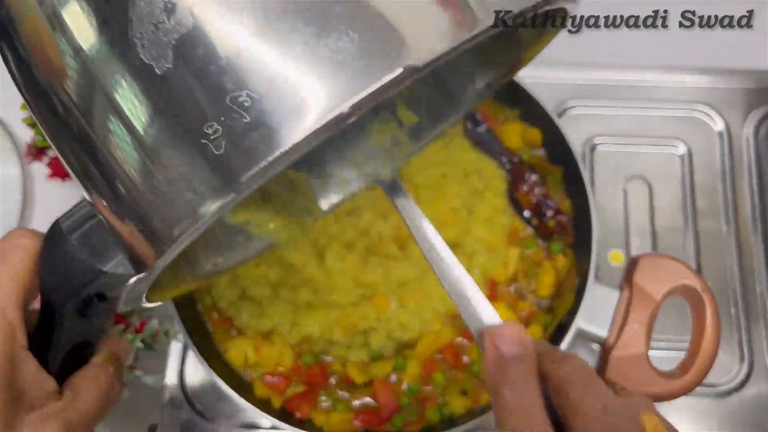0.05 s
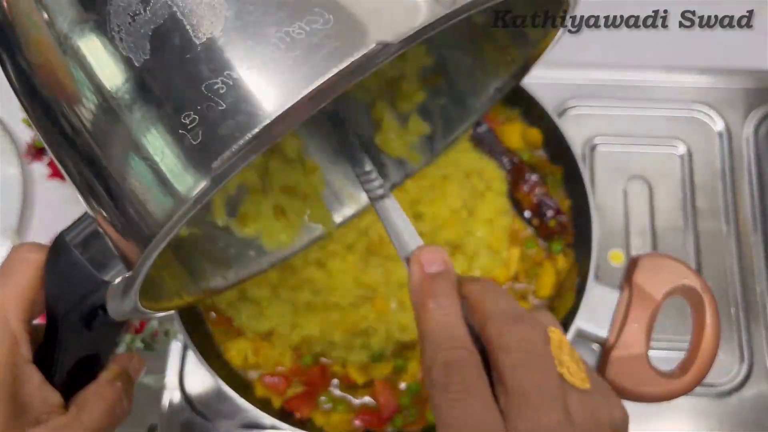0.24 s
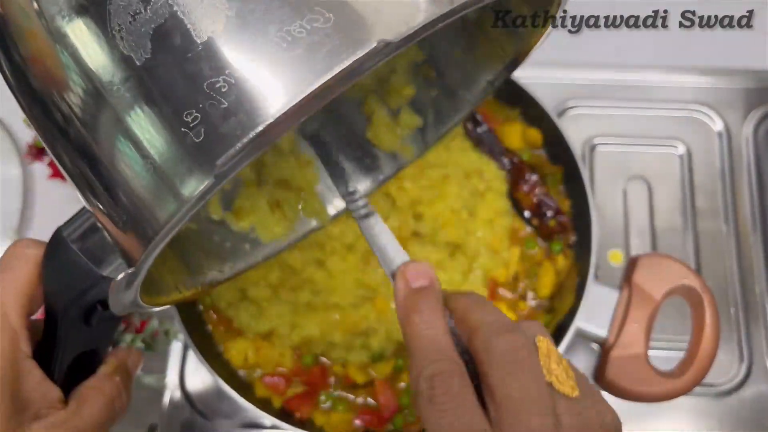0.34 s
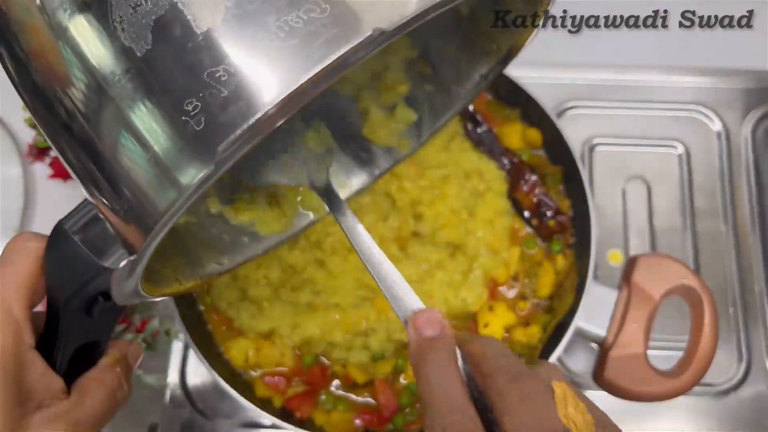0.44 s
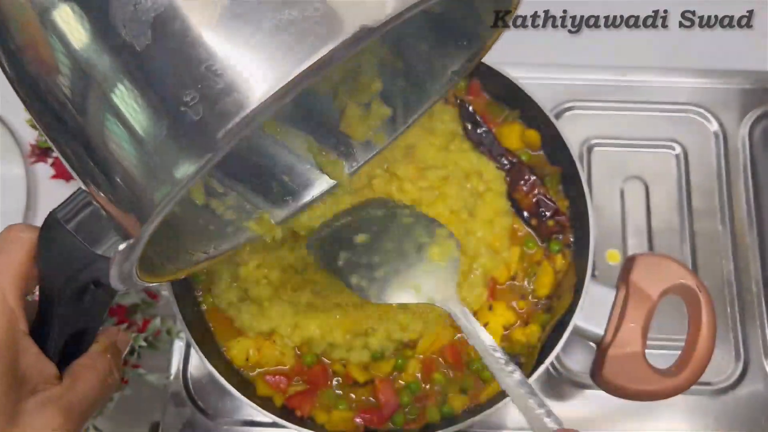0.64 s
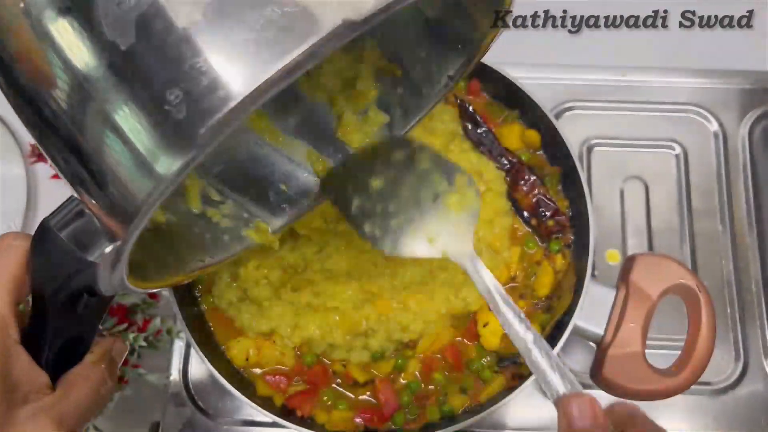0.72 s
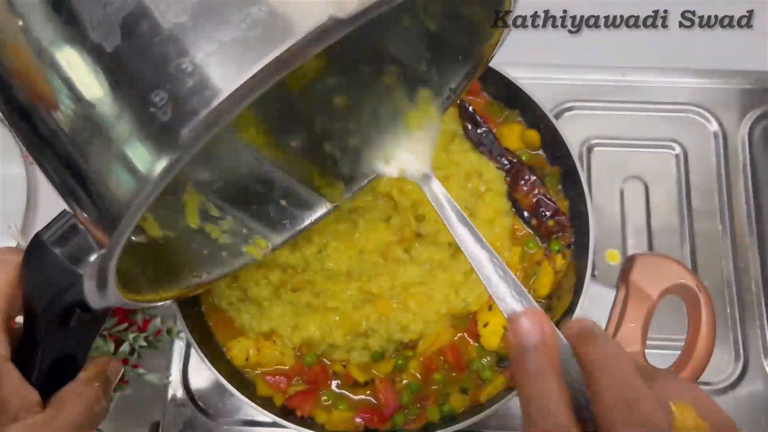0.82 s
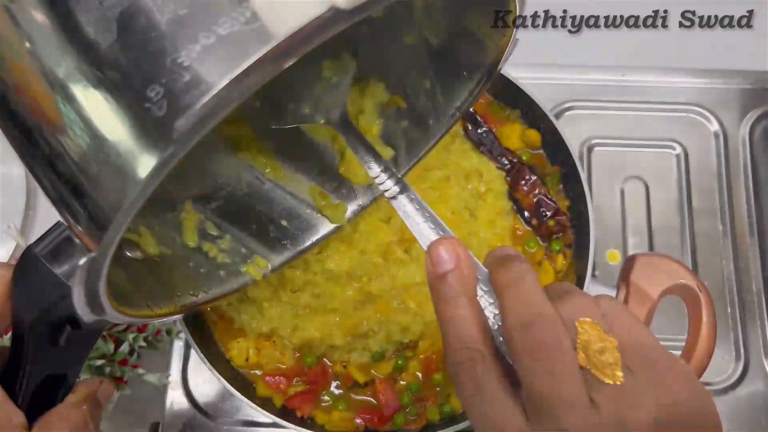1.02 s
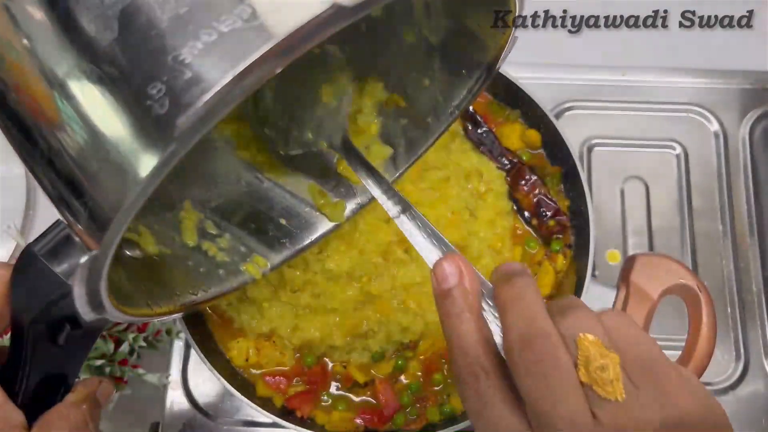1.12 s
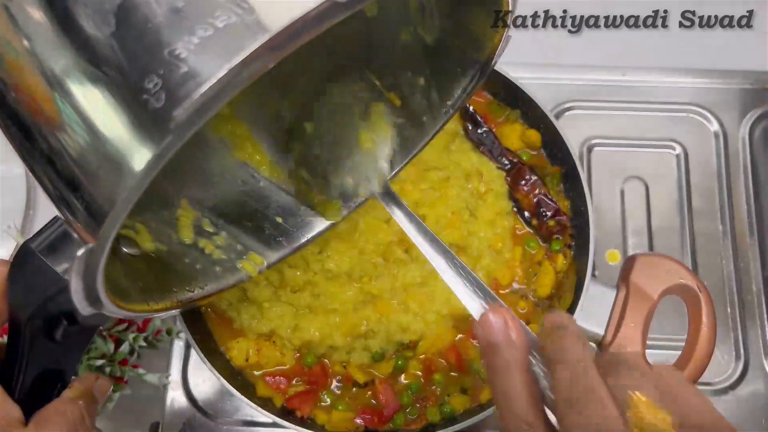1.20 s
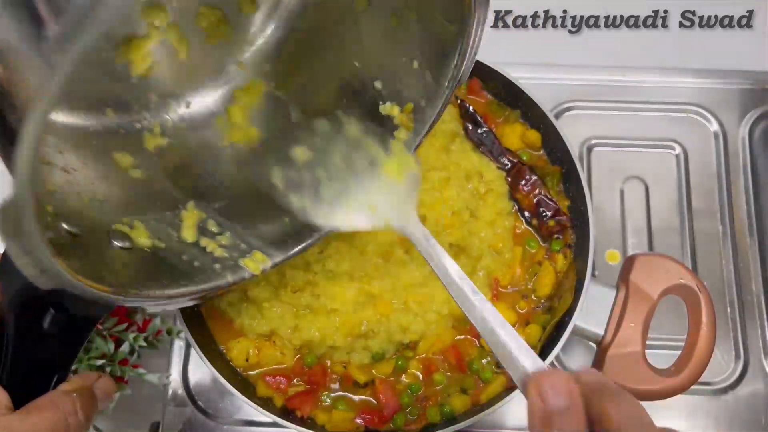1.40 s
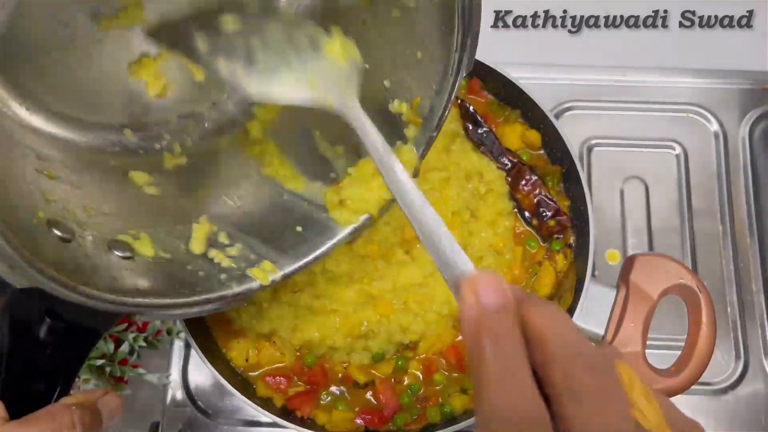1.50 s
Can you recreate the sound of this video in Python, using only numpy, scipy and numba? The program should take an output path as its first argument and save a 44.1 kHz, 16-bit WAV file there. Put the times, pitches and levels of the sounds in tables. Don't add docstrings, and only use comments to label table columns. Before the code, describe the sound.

Close and fairly dry, a metal spoon raps a steel pot in quick clusters, drags with a bright gritty hiss, pauses, then knocks harder and scrapes shorter, above wet food ticks and low kitchen fan noise.

```python
import sys
import numpy as np
from scipy import signal
from scipy.fft import rfft, irfft
from scipy.io import wavfile
from scipy.ndimage import uniform_filter1d
from numba import njit

SR = 44100
rng = np.random.default_rng(int(sys.argv[2]) if len(sys.argv) > 2 else 0)


def persist_wave(psi):
    counts = np.round(np.clip(psi, -1, 1) * 32767).astype(np.int16)
    wavfile.write(sys.argv[1], SR, np.atleast_2d(counts).T)


def gain_from_db(level_db):
    decades = np.asarray(level_db, float) / 20
    return 10 ** decades


N = 68355
T = np.arange(N) / SR
FREQ = np.maximum(np.arange(N // 2 + 1) * SR / N, 1)

# f/Hz, level/dB
SHEET = [(300, -19), (800, -9.5), (3000, 4), (4300, -3.5), (5400, -1), (6600, 3.5), (8500, 5), (16000, -5)]
# f/Hz, level/dB, T60/s
LIFT_B = [(1565, -46, .3), (2057, -47, .5), (3101, -46, .3), (3806, -42, .2), (4956, -52, .4),
          (5435, -40, .13), (5795, -38, .2), (6400, -44, .22), (10130, -46, .2)]


def unit(x):
    return x / np.sqrt(np.mean(x ** 2))


def read(table, hz):
    table_hz, table_db = np.array(table).T
    return np.interp(np.log(hz), np.log(table_hz), table_db)


def add(out, s, x):
    i = int(s * SR)
    out[i:i + len(x)] += x[:N - i]


def band(x, hz, width):
    return signal.lfilter(*signal.iirpeak(min(hz, SR * .45), hz / width, fs=SR), x)


def walk(rate, count=N):
    k = int(SR / rate)
    steps = np.repeat(rng.standard_normal(count // k + 1), k)
    return 1.74 * uniform_filter1d(uniform_filter1d(steps, k), k)[:count]


def kitchen():
    # f/Hz, level/dB per Hz
    room_noise = [(30, 2), (60, -5), (100, -2), (200, -23.5), (300, -15), (500, -7.5), (1400, -16.5),
                  (5000, -26.5), (16000, -28.5)]
    # f/Hz, width/Hz, level/dB
    fan = [(78.5, 9.4, -56), (121.2, 4.1, -59.5), (155.9, 4, -66), (294.4, 16, -64), (527, 14, -71),
           (891, 22, -70.5)]
    out = 0
    for hz in 35 * 2 ** np.arange(0, 9, .5):
        window = np.maximum(1 - np.abs(np.log2(FREQ / hz)) * 2, 0) ** .5
        noise = irfft(rfft(rng.standard_normal(N)) * window * gain_from_db(read(room_noise, FREQ)), N)
        out = out + noise * gain_from_db(0.15 * walk(8.0))
    hum = sum(gain_from_db(db) * unit(band(rng.standard_normal(N), hz, w)) for hz, w, db in fan)
    return gain_from_db(-54) * unit(out) + hum


def food():
    # t/s, level/dB, f/Hz
    pops = [(0.0376, -49, 11000), (0.095, -49, 7500), (0.189, -49.5, 2480), (0.769, -54, 8400),
            (.8, -53, 10500), (0.856, -48.5, 12300), (.881, -52, 8550), (.8964, -46.5, 5400),
            (0.901, -43, 10400), (0.915, -48.5, 1900), (0.928, -46.5, 4770), (.964, -58, 14500),
            (1.03, -56, 7900), (1.036, -55, 13900), (1.053, -55, 6660), (1.397, -40.5, 1660),
            (1.415, -47, 4470), (1.478, -54, 8100), (1.488, -52, 12600), (1.53, -80, 12000)]
    pop_s, pop_q = 0.0033, 7.6
    fizz_per_s, fizz_db = 120, -58
    out, t = np.zeros(N), T[:int(.02 * SR)]
    c = rng.random((int(fizz_per_s * N / SR), 3))
    small = [(a * T[-1], fizz_db - 2.0 * np.log(b + 1e-3), 2500 * 6 ** h) for a, b, h in c]
    for s, db, hz in small + pops:
        pop = unit(band(rng.standard_normal(len(t)), hz, hz / pop_q))
        add(out, s, gain_from_db(db) * pop * np.exp(-t / pop_s))
    return out


@njit
def modes(pole, size, length):
    out = np.zeros(length)
    for k in range(len(pole)):
        z, i = size[k], 0
        while i < length and abs(z.real) + abs(z.imag) > 1e-6:
            out[i] += z.imag
            z *= pole[k]
            i += 1
    return out


def sheet(hz, chance, tilt_db, decay):
    t60_at_3khz, t60_slope, scatter_db = 0.09, -0.27, 5
    db = read(SHEET, hz) + tilt_db * np.log2(hz / 3000) + scatter_db * chance[0]
    t60 = decay * t60_at_3khz * (hz / 3000) ** t60_slope * gain_from_db(2.0 * chance[1])
    pole = np.exp((2j * np.pi * hz - np.log(1000) / t60) / SR)
    size = gain_from_db(db) * np.exp(2j * np.pi * chance[2]) / np.sqrt(np.sum(gain_from_db(db) ** 2) / 2)
    return modes(pole, size, int(.2 * SR))


def struck(table):
    wobble_db, wobble_per_s = 1.2, 45
    t = T[:int(.4 * SR)]
    out = np.zeros(len(t))
    for k, (hz, db, t60) in enumerate(table):
        level = gain_from_db(db + wobble_db * walk(wobble_per_s, count=len(t)))
        decay = np.exp(-np.log(1000) * t / max(t60, .02))
        out += (-1) ** k * level * decay * np.sin(2 * np.pi * hz * t)
    return out


def patchy(x):
    patch_db, patches_per_s = 1.7, 35
    spectrum = rfft(x)
    out = np.zeros(N)
    for hz in 300 * 2 ** (np.arange(19) / 3):
        window = np.maximum(1 - np.abs(np.log2(FREQ / hz)) * 3, 0)
        out += irfft(spectrum * window, N) * gain_from_db(patch_db * walk(patches_per_s))
    return out


def drag(hz):
    # t/s, pressure/dB, brightness/dB (top raised, low lowered)
    first = [(.37, -42, 15), (.41, -44.5, -12), (.435, -37.5, -1), (.455, -35.5, -2.5), (.5, -36.5, 2),
             (.53, -32, 0), (.548, -42.5, 1), (.556, -33, -6), (.59, -37, -1.5), (.608, -33.5, -3.5),
             (.635, -50.5, -6.5), (.7, -54, -8)]
    second = [(1.138, -34.5, 5), (1.18, -37, -2.5), (1.225, -32, -0.5), (1.245, -32.5, 0), (1.268, -36, 4),
              (1.298, -38, -3), (1.324, -52, 8), (1.381, -73, -8)]
    # f/Hz, level/dB per Hz
    edge = [(300, -32.5), (1000, -21), (2000, -18.5), (4400, -11.5), (8000, -9.5), (12000, -7),
            (16000, -10)]
    grit_per_s, grit_db = 9000, 2
    hiss_db, ring_db, sing_db = -7, -3.5, -19

    rows = np.array(list(first) + list(second))
    on = sum((T > np.array(d)[0, 0]) & (T < np.array(d)[-1, 0]) for d in (first, second))
    pressure_db = np.interp(T, rows[:, 0], rows[:, 1]) + 0.52 * walk(60.3)
    gain = uniform_filter1d(on * 1., size=400) * gain_from_db(pressure_db)

    c = rng.random((3, N))
    grit = unit((c[0] < grit_per_s / SR) * np.sign(c[1] - .5) * gain_from_db(-grit_db * np.log(c[2] + 1e-4)))
    hiss = gain_from_db(hiss_db) * unit(irfft(rfft(grit) * gain_from_db(read(edge, FREQ)), N))
    body = sheet(hz, 0.5 * rng.standard_normal((3, len(hz))), 0, 1.06)
    recolour = gain_from_db(read(edge, FREQ) - read(SHEET, FREQ))
    ringing = irfft(rfft(grit * gain) * rfft(body, N) * recolour, N)
    scrape = patchy(hiss * gain + gain_from_db(ring_db) * unit(ringing) * np.sqrt(np.mean(gain ** 2)))

    low = signal.sosfiltfilt(signal.butter(2, 4000, fs=SR, output="sos"), scrape)
    top = signal.sosfiltfilt(signal.butter(2, 10500, "high", fs=SR, output="sos"), scrape)
    tilt = gain_from_db(np.interp(T, rows[:, 0], rows[:, 2]))
    tilted = low / tilt + (scrape - low - top) + top * tilt

    wall = struck(LIFT_B)
    singing = signal.fftconvolve(grit * gain, wall / np.linalg.norm(wall))[:N]
    return tilted + gain_from_db(sing_db) * singing


def squeaks():
    # t/s, length/s, f/Hz, level/dB
    squeak_table = [(.475, .06, 7337, -45), (.47, .04, 13445, -45), (.48, .05, 12250, -46),
                    (.51, .06, 5270, -45), (.55, .07, 5449, -43), (.55, .04, 3850, -44),
                    (.55, .05, 4367, -46), (.55, .03, 1855, -43), (.595, .04, 9070, -44),
                    (.6, .04, 6230, -46), (1.2, .1, 9695, -44), (1.24, .09, 5400, -44),
                    (1.27, .07, 5795, -44), (1.23, .06, 6800, -45), (.6, .04, 6900, -46)]
    width_hz = 27
    out = np.zeros(N)
    for s, length_s, hz, db in squeak_table:
        x = band(rng.standard_normal(int(.12 * SR)), hz, width_hz)
        x = x[-int(min(length_s, .11) * SR):]
        add(out, s, gain_from_db(db) * unit(x) * np.hanning(len(x)))
    return out


def knocks(hz):
    # t/s, clang level/dB, tilt/dB per octave, decay factor, thud level/dB
    blows = [(0.2432, -17, 8, 0.85, -30.5), (0.2484, -23.5, 3, 0.66, -35), (0.3468, -17, -1.5, 0.33, -32),
             (0.3479, -16.5, 6.5, 0.38, -23.5), (0.3536, -14, -2, 0.32, -27), (0.3612, -26, 4.5, 0.27, -59),
             (0.3626, -22.5, -2.5, 0.98, -41), (0.4422, -27, 30, 0.45, -62), (0.552, -25, -1, 0.68, -33.5),
             (0.564, -42, -3, 0.33, -54), (0.6671, -23.5, 13, 0.13, -71), (1.1156, -12, 6.5, 0.41, -39.5),
             (1.1177, -11.5, -1, 0.2, -52), (1.1194, -24.5, -0.5, 1.53, -43), (1.232, -31.5, 1, 0.67, -47),
             (1.2733, -23, 3.5, 1.12, -44), (1.544, -40.5, -4.5, 0.41, -68)]
    thud_hz, thud_s, rise_s = 450, 0.005, .0007
    out, t = np.zeros(N), T[:int(.2 * SR)]
    chance = rng.standard_normal((len(blows), 3, len(hz)))
    for (s, db, tilt_db, decay, thud_db), c in zip(blows, chance):
        thud = unit(band(rng.standard_normal(len(t)), thud_hz, thud_hz)) * np.exp(-t / thud_s)
        clang = sheet(hz, c, tilt_db, decay)
        add(out, s, (gain_from_db(db) * clang + gain_from_db(thud_db) * thud) * (1 - np.exp(-t / rise_s)))
    return out


def rings():
    # f/Hz, level/dB, T60/s
    rim = [(300, -36, .07), (518, -32, .09), (620, -34, .09), (1008, -36, .06), (1443, -36, .07),
           (3064, -36, .25), (3590, -31, .08), (3270, -38, .1), (4935, -32, .19), (5143, -33, .2),
           (3803, -40, .1), (5499, -31, .16), (5946, -24, .08), (7290, -36, .2)]
    land = [(269, -31, .06), (550, -29, .08), (951, -34, .05), (1236, -29, .06), (1520, -13.5, .2),
            (1600, -13.5, .2), (2164, -30, .06), (2442, -27, .08), (2700, -29, .06), (3111, -20, .1),
            (6399, -32, .06), (7481, -30, .06)]
    floor = [(1536, -26, .45), (1478, -31, .25), (1602, -29, .35), (1339, -38, .15), (1570, -21, .05),
             (1230, -42, .2), (1663, -40, .2), (1900, -41, .4), (3058, -26, .6), (3104, -23, .8),
             (3184, -37, .2), (4942, -43, 1), (4959, -43, 1), (523, -40, .15)]
    wall = [(722, -34, .2), (1106, -38, .3), (1553, -29, .45), (1445, -32, .14), (1505, -35, .3),
            (1644, -36, .15), (1575, -19, .055), (2200, -23, .05), (3040, -23, .07), (2560, -27, .07),
            (3091, -17, .19), (3108, -17.5, .19), (4937, -33, .3), (4975, -36, .12)]
    # f/Hz, level/dB, T60/s
    shared = [(2030, -46, .45), (2445, -34, .1), (3806, -42, .3), (5515, -38, .25), (5985, -40, .18),
              (7620, -38, .1), (8660, -40, .15), (9310, -33, .18), (10640, -42, .12)]
    struck_s = [
        0.2428,
        0.3461,
        0.3628,
        1.1155,
    ]
    # t/s, drop/dB, knock level/dB, shared modes level/dB
    pressed = [
        (.3, -2, 0, -8),
        (.3562, -20, 0, 0),
        (.409, -10, 0, -4),
        (1.19, -4, 0, 0),
    ]
    # t/s, level/dB, rise/s
    lifts = [
        (0.599, 2, 0.0068),
        (1.274, 1, 0.0009),
    ]
    # f/Hz, level/dB, T60/s
    lift_a = [(1553, -41, .35), (1853, -41, .55), (1949, -45, .26), (2140, -43, .22), (3096, -45, .29),
              (3762, -39, .36), (3810, -42, .38), (5505, -45, .19), (9189, -44, .1)]
    # t/s, f/Hz, level/dB, T60/s
    touches = [(.411, 1545, -30, .1), (1.168, 4940, -38, .2), (1.12, 10069, -38, .2),
               (.427, 1560, -33, .08), (.444, 3088, -37, .3), (.467, 1540, -37, .2), (.467, 1585, -41, .25),
               (.5, 3094, -46, .4), (.785, 895, -53, .2), (.71, 920, -58, .3), (.86, 830, -57, .2),
               (1.208, 1546, -36, .25), (1.219, 3092, -38, .2), (1.23, 4734, -42, .15),
               (1.35, 3100, -57, .8), (1.42, 3098, -58, .3)]
    press_time_s, touch_rise_s = .002, 0.0013

    out = np.zeros(N)
    for s, table, (press_s, drop_db, db, shared_db) in zip(struck_s, (rim, land, floor, wall), pressed):
        x = gain_from_db(db) * struck(table) + gain_from_db(shared_db) * struck(shared)
        choke = 1 + np.tanh((s + T[:len(x)] - press_s) / press_time_s)
        add(out, s, x * gain_from_db(drop_db / 2 * choke))
    for (s, db, rise_s), table in zip(lifts, (lift_a, LIFT_B)):
        x = struck(table)
        add(out, s, gain_from_db(db) * x * (1 - np.exp(-T[:len(x)] / rise_s)))
    for s, hz, db, t60 in touches:
        x = struck([(hz, db, t60)])
        add(out, s, x * (1 - np.exp(-T[:len(x)] / touch_rise_s)))
    return out


def room(near):
    t60_s, tail_db, dull_hz = 0.43, -12.5, 5400
    t = T[:int(.4 * SR)]
    tail = signal.lfilter(*signal.butter(1, dull_hz, fs=SR), rng.standard_normal(len(t)))
    tail = tail * np.exp(-np.log(1000) * t / t60_s) * (t > .004)
    return gain_from_db(tail_db) * signal.fftconvolve(near, tail / np.linalg.norm(tail))[:N]


def scene():
    hz = 250 + 16500 * ((np.arange(600) + rng.random(600)) / 600) ** 1.3
    near = knocks(hz) + drag(hz) + squeaks() + food()
    return (near + room(near) + rings() + kitchen())[None]


def roll_off(x):
    return signal.sosfilt(signal.butter(12, 17090, fs=SR, output="sos"), x)


def record(dry):
    top_hz, top_shelf_db, bass_cut_hz = 15800, -34, 62
    top = gain_from_db(np.interp(FREQ, [top_hz, top_hz + 150], [0, top_shelf_db]))
    bass = 1 / np.sqrt(1 + (bass_cut_hz / FREQ) ** 8)
    mix = irfft(rfft(dry) * top * bass, N)
    return roll_off(mix)


dry = scene()
out = record(dry)
persist_wave(out)
```